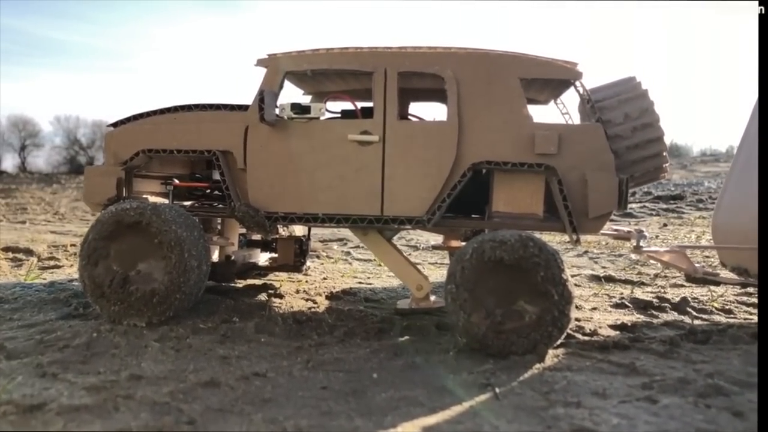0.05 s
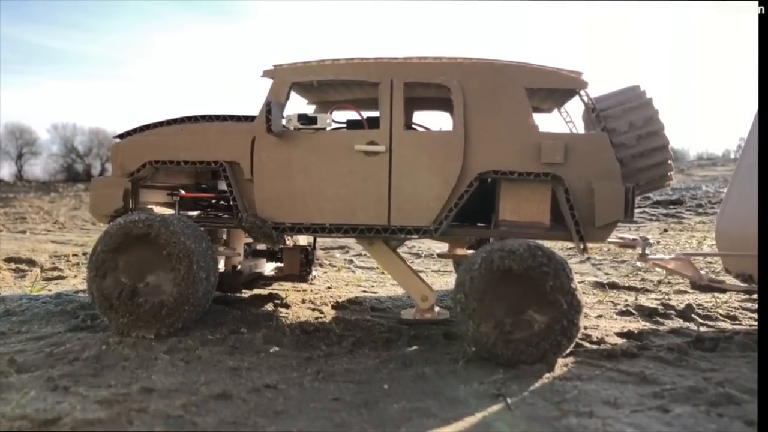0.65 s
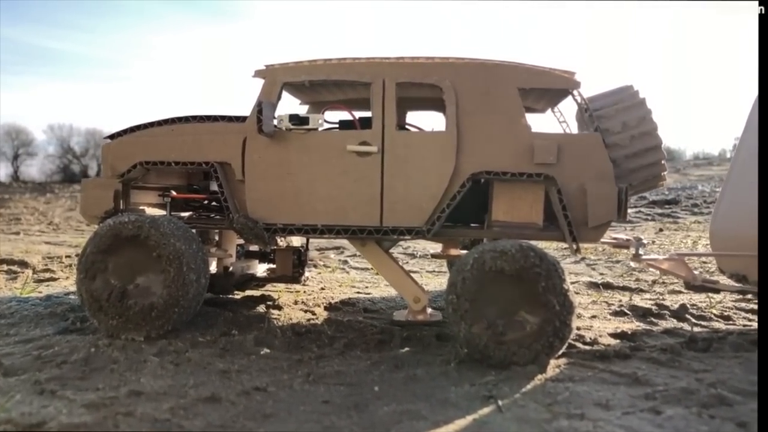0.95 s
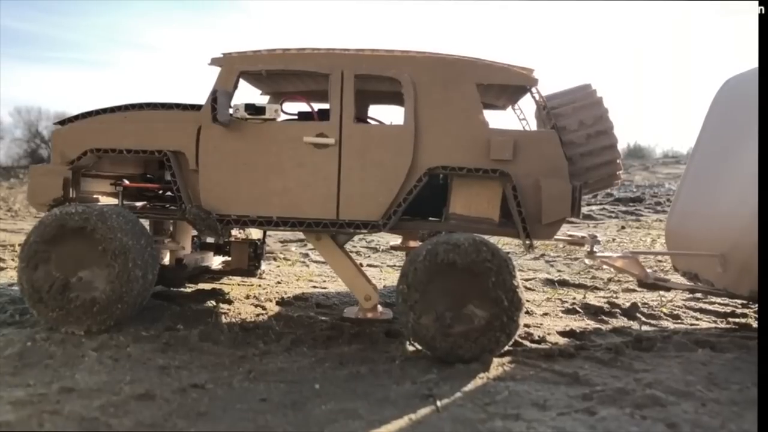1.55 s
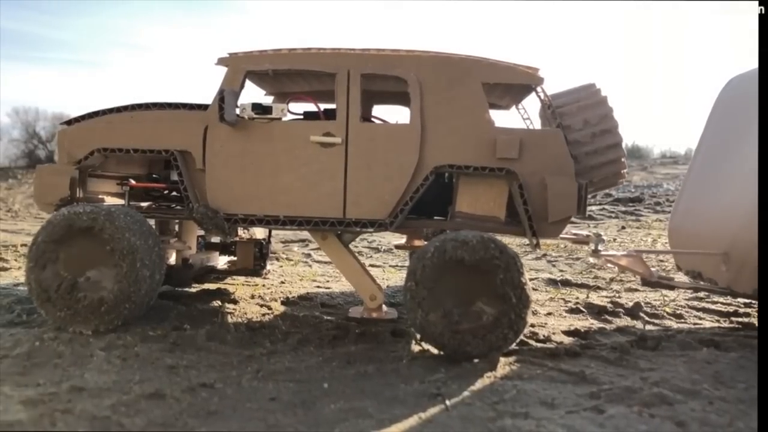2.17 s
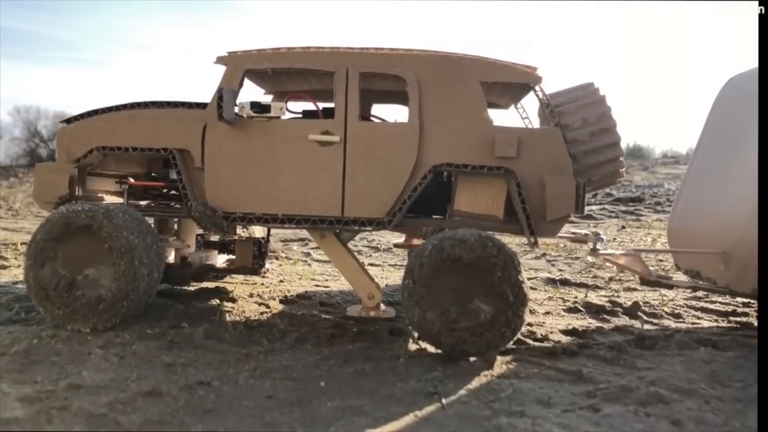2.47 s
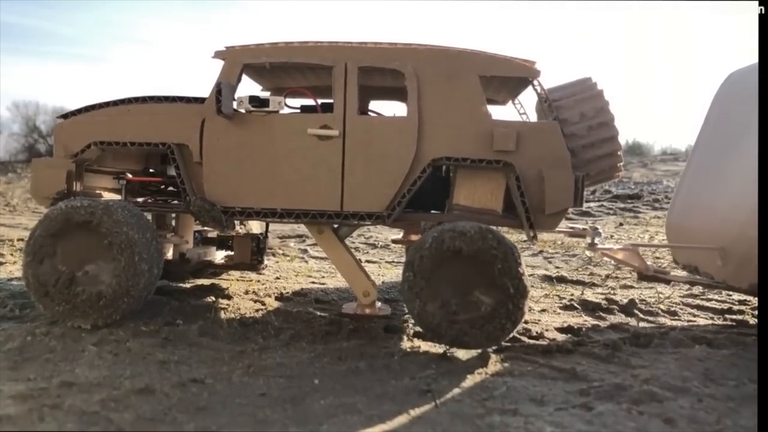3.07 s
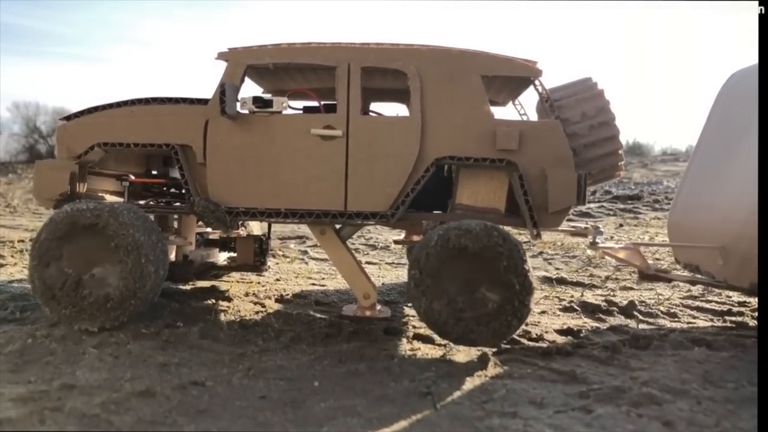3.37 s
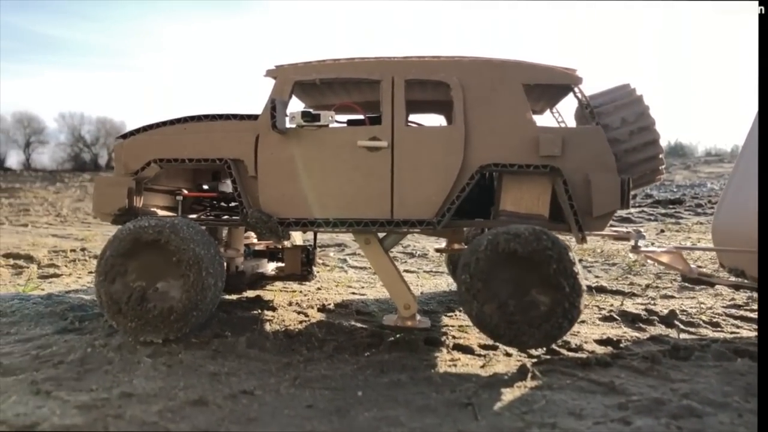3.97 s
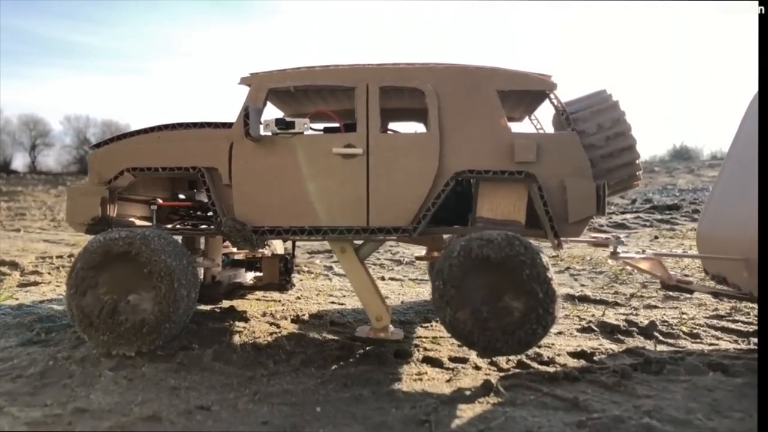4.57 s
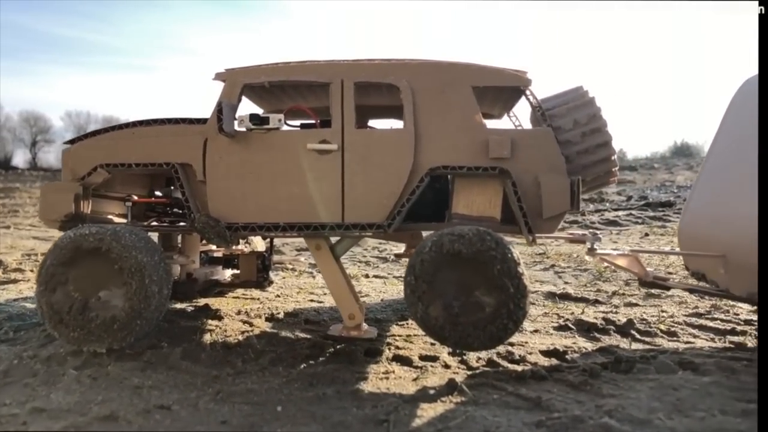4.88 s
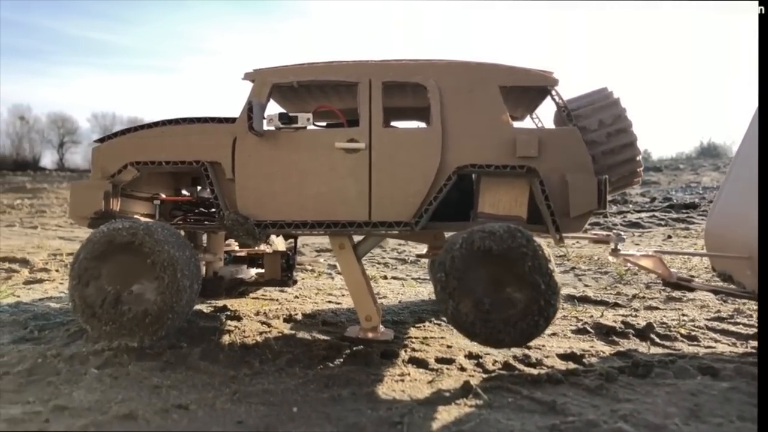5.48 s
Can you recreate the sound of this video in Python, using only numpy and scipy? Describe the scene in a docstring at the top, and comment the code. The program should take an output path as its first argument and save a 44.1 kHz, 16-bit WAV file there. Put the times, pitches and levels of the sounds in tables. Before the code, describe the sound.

Gusts rumble on the microphone while a model truck's little geared motor whines, bogs down under load and picks up again.

```python
"""A model truck jacks itself up on its legs on a dirt field, close to the microphone.
From the start, gusts rumble and thump on the microphone while the small electric motor whines freely
and its gears hiss in their housing. At 1 s the feet touch down; at 1.3 s a leg clicks as it takes
the weight, and the motor bogs down and hunts. From 3 s it picks up again, slowed briefly by each
snag of the legs."""
import sys
import numpy as np
from scipy.fft import rfft, irfft, next_fast_len
from scipy.io import wavfile
from scipy.ndimage import uniform_filter1d, map_coordinates

SR = 44100
rng = np.random.default_rng(int(sys.argv[2]) if len(sys.argv) > 2 else 0)


def dump(signal):
    """Clip the signal to [-1, 1] and save it as 16-bit WAV at the path in sys.argv[1]."""
    limited = np.clip(np.atleast_2d(signal).T, -1, 1)
    pcm = np.round(limited * 32767).astype(np.int16)
    wavfile.write(sys.argv[1], SR, pcm)


N = 248261

# progress of the lift: time_s, stage (0 free, 1 straining, 2 lifting)
LIFT_STAGE = [(0, 0.04), (1.0, 0), (1.05, 0.15), (1.31, .25), (1.33, 1), (2.95, 1), (3.25, 1.35),
              (3.8, 1.9), (5.63, 2.1)]


def amp(db):
    """Amplitude ratio of a level in decibels."""
    return 10 ** (np.asarray(db) / 20)


def unit(x):
    """Normalisation to rms 1."""
    return x / np.sqrt(np.mean(x ** 2) + 1e-20)


def along(points, hz):
    """Interpolation of (frequency_hz, value) points on a logarithmic frequency axis."""
    knots_hz, values = np.transpose(points)
    return np.interp(np.log(hz + 1), np.log(knots_hz + 1), values)


def curve(points):
    """Linear interpolation of (time_s, value) points at every sample."""
    return np.interp(np.arange(N) / SR, *np.transpose(points))


def wobble(rate_hz):
    """Smooth random modulation: a spline through rate_hz Gaussian values a second."""
    return map_coordinates(rng.standard_normal(N // 8), [np.arange(N) * rate_hz / SR], mode="wrap")


def filtered(x, response):
    """Linear filtering: the spectrum is multiplied by a frequency response."""
    size = next_fast_len(N + SR // 2)
    return irfft(rfft(x, size) * response(np.fft.rfftfreq(size, 1 / SR)), size)[:N]


def noise(spectrum):
    """Spectral shaping of white noise, at rms 1."""
    return unit(filtered(rng.standard_normal(N), lambda hz: amp(along(spectrum, hz))))


def ringing(modes):
    """Resonance: noise drives (centre_hz, width_hz, level_db) modes whose powers add; rms 1."""
    def response(f):
        peaks = (amp(db) / (1 + (2 * (f - hz) / width) ** 2) for hz, width, db in modes)
        return np.sqrt(sum(peak ** 2 for peak in peaks))
    return unit(filtered(rng.standard_normal(N), response))


def gust_envelope(layer, breeze_db, t60_s, attack_s=0.022):
    """Gusts rise, hold and decay exponentially to the breeze (layer 0 rumble, 1 flutter)."""
    # gusts of wind: start_s, length_s, rumble_db, flutter_db
    gusts = [(0, 0.056, -23, -34.5), (0.152, 0.45, -29, -35), (0.656, 0.086, -24.5, -30.5),
             (0.799, 0.18, -29.5, -35.5), (1.076, 0.012, -20, -25.5), (1.131, 0.17, -33, -32.5),
             (1.354, .22, -43, -57), (1.707, .015, -44, -54), (2.02, 0.04, -33, -30.5),
             (2.168, .1, -33.5, -36.5), (2.316, 0.17, -39.5, -48.5), (2.74, 0.057, -32.5, -31.5),
             (2.931, 0.038, -36.5, -45.5), (3.216, 0.028, -43, -60), (3.393, .04, -29.5, -33),
             (3.529, .11, -37, -51), (3.719, 0.065, -31.5, -40.5), (3.91, 0.36, -33.5, -48),
             (4.324, 0.015, -31, -39.5), (4.492, 0.069, -33, -41.5), (4.583, .41, -32.5, -41.5),
             (5.075, 0.5, -36.5, -43)]
    t = np.arange(N) / SR
    gain = np.full(N, amp(breeze_db))
    for start_s, length_s, *levels_db in gusts:
        rise = np.clip(1 + (t - start_s) / attack_s, 0, 1)
        decay_db = 60 * np.maximum(t - start_s - length_s, 0) / t60_s
        gain = np.maximum(gain, rise * amp(levels_db[layer] - decay_db))
    return gain


def wind(rumble_gain_db, flutter_gain_db, lumpy_db, swirl_db):
    """Turbulent pressure on the microphone: a deep rumble and a lumpy flutter above it."""
    # spectra of the turbulence: frequency_hz, relative_density_db
    rumble_spectrum = [(12, -36), (25, 4), (42, 3.5), (75, 0.5), (110, -4), (160, -15.5), (300, -38.5),
                       (600, -114)]
    flutter_spectrum = [(60, -22), (130, 4.5), (200, -3), (300, -7), (500, -19.5), (800, -34.5),
                        (1400, -45.5), (3000, -57)]
    rumble = noise(rumble_spectrum)
    # evened out, so that the gusts set its slow swell
    rumble /= np.sqrt(abs(uniform_filter1d(rumble ** 2, SR // 14)) + 0.00087)
    rumble *= gust_envelope(0, breeze_db=-54, t60_s=0.31)
    flutter = unit(noise(flutter_spectrum) * amp(lumpy_db * wobble(60)))
    flutter *= gust_envelope(1, breeze_db=-60.5, t60_s=0.15)
    swirl = unit(amp(swirl_db * wobble(25)))
    return swirl * (amp(rumble_gain_db) * rumble + amp(flutter_gain_db) * flutter)


def buffets(period_growth, t60_s, ragged_db):
    """A passing eddy is a damped pressure oscillation that slows; soft ones start lower and duller."""
    # eddies that hit the microphone: start_s, level_db, edge_db (higher is sharper)
    eddies = [(0.138, -14, -27.5), (0.208, -27, -32), (0.262, -13.5, -40), (0.376, -27, -12.5),
              (0.5, -23, -18), (0.556, -19.5, -20), (0.654, -23, -14), (0.696, -22, -13.5),
              (0.716, -16.5, -23.5), (0.804, -13, -17.5), (0.842, -26, -20.5), (0.883, -20, -28),
              (1.069, -21, -21.5), (1.161, -26, -20), (1.188, -23, -12.5), (1.234, -26, -13),
              (1.272, -22.5, -14), (2.03, -21.5, -24), (2.258, -17, -12.5), (2.443, -35, -16),
              (2.752, -21.5, -27), (2.803, -26.5, -12), (2.848, -24, -32), (3.4, -20.5, -24),
              (3.419, -28.5, -18), (3.534, -33.5, -19), (3.715, -25.5, -22), (3.751, -33, -18),
              (4.337, -26.5, -31.5), (4.439, -21, -32.5), (4.586, -18, -32), (4.788, -20.5, -31),
              (4.824, -23, -30), (4.956, -25, -23.5), (5.19, -21.5, -21.5), (5.532, -25.5, -17.5)]
    # colour of the sharpest eddy: frequency_hz, gain_db
    eddy_spectrum = [(45, -18.5), (95, -8), (200, -3.5), (420, -4), (900, -9), (1400, -19)]
    sharp_edge_db, sharp_hz, knee_hz = -12, 1397.5, 204
    t = np.arange(SR // 8) / SR
    out = np.zeros(N + SR)
    for start_s, level_db, edge_db in eddies:
        softness_db = sharp_edge_db - edge_db
        first_hz = sharp_hz * 2 ** (-softness_db / 12)
        hz = 1 / (1 / first_hz + period_growth * t)
        # no two swings are alike in length or size, so the thump is ragged
        chance = rng.standard_normal((2, 40))
        swings = np.cumsum(hz) / SR
        stretch, size = (map_coordinates(row, [3 * swings], mode="wrap") for row in chance)
        phase = 2 * np.pi * (np.cumsum(hz * np.exp(.25 * stretch)) / SR + chance[0, -1])
        dulling_db = 0.64 * softness_db * np.log2(np.maximum(hz / knee_hz, 1))
        db = level_db + along(eddy_spectrum, hz) + ragged_db * size - dulling_db
        envelope = amp(db - 60 * t / t60_s) * (1 - np.exp(-t * first_hz))
        out[round(start_s * SR):][:len(t)] += envelope * np.sin(phase)
    return out[:N]


def shaft_speed():
    """Load slows a motor: its rotation rate in Hz sags under the weight and dips at each snag."""
    # rotation of the motor shaft: time_s, speed_hz
    rotation = [(0, 205), (1.01, 193.3), (1.04, 188), (1.31, 185.5), (1.325, 159), (1.37, 159), (1.45, 128),
                (1.58, 154), (1.64, 146), (1.69, 130), (1.87, 124), (2.0, 135), (2.07, 123), (2.24, 121),
                (2.36, 135), (2.55, 144), (2.87, 123), (3.02, 146), (3.13, 144), (3.2, 153), (3.85, 153.5),
                (3.93, 159), (4.6, 159.5), (5.05, 165.5), (5.28, 173), (5.63, 174)]
    # snags of the legs: centre_s, length_s, lost_hz
    snags = [(4.055, .11, 8), (4.15, .2, 8), (4.4, .16, 10), (4.77, .2, 7.5), (5.11, .13, 11),
             (5.39, .18, 8)]
    t = np.arange(N) / SR
    dips = sum(lost_hz * np.cos(np.pi * np.clip((t - centre_s) / length_s, -.5, .5)) ** 2
               for centre_s, length_s, lost_hz in snags)
    return curve(rotation) - dips


def strain(easy_hz=154, bogged_hz=136):
    """Strain grows as speed falls: 0 while the motor turns easily, 1 when it is bogged down."""
    return np.clip((easy_hz - shaft_speed()) / (easy_hz - bogged_hz), 0, 1)


def loaded(free_db, touch_db, bearing_db, strain_db, bite_db):
    """Level follows load: it steps at touch-down, surges as the gears bite, then tracks the strain."""
    touch_s, load_s, settle_s, bite_decay_s = 1.03, 1.325, .025, 0.13
    steps = [(touch_s - settle_s, free_db), (touch_s, touch_db),
             (load_s - settle_s / 2, touch_db), (load_s, bearing_db)]
    age = np.arange(N) / SR - load_s
    bite = np.clip(1 + 2 * age / settle_s, 0, 1) * np.exp(-np.maximum(age, 0) / bite_decay_s)
    return curve(steps) + strain_db * strain() + bite_db * bite


def leg_click(start_s, peak_db, t60_s):
    """A broadband transient, decaying exponentially, as a leg takes the weight."""
    age = np.arange(N) / SR - start_s
    return amp(peak_db - 60 * abs(age) / t60_s) * (age > 0) * rng.uniform(-1, 1, N)


def gears(chatter_db, drift_db):
    """Friction of sliding teeth excites gear and housing modes; the hiss changes colour with the load."""
    # modes of the gears: centre_hz, width_hz, free_db, straining_db, lifting_db
    gear_modes = [(4800, 370, -14, -9, -12), (6210, 820, -12, -37, -11), (6860, 440, -15, -13.5, -10.5),
                  (7925, 740, -3, -6, 2.5), (8820, 1500, -7, -7, -9), (9830, 450, -4.5, 2.5, 3.5),
                  (10650, 640, -10, -3, -2.5), (11380, 900, -12.5, -4.5, -32), (12290, 570, -23, -5, 4),
                  (13100, 800, -10, -18, -38), (14200, 1050, -13, -6, -9), (14400, 1500, -16, -15, -7)]
    # modes of the housing: centre_hz, width_hz, level_db
    housing_modes = [(820, 7800, -19.5), (1020, 170, -17.5), (1580, 1300, -11), (1998, 209, 6),
                     (2464, 650, -5), (3317, 390, -10.5), (3753, 390, -10), (4166, 270, -10),
                     (4650, 430, -9.5), (5190, 410, -12.5)]
    stage = curve(LIFT_STAGE)
    hiss = np.zeros(N)
    for k in range(3):
        share = np.clip(1 - abs(stage - k), 0, 1)
        hiss += np.sqrt(share) * ringing([(hz, width, levels[k]) for hz, width, *levels in gear_modes])
    contact_force = unit(amp(chatter_db * wobble(150)))
    hiss *= contact_force * amp(loaded(-57, -56, -49.5, strain_db=-1, bite_db=1))
    housing = ringing(housing_modes) * amp(loaded(-56.5, -56, -54.5, strain_db=-1.5, bite_db=1))
    return amp(drift_db * wobble(85)) * (housing + hiss)


def motor_whine(segments, jitter_cycles, flicker_db):
    """Harmonics of the commutation rate, set by the segments of the commutator, blurred by jitter, over a hum
    of shaft orders."""
    # radiation response of the motor can: frequency_hz, gain_db
    can_response = [(4500, -22), (6000, -21), (6700, -14), (7250, -17), (7700, 0), (8900, -2), (9300, -5),
                    (9850, 0), (10400, -8), (11300, -7), (12300, -5), (13100, -13), (14500, -13)]
    # low harmonics of the shaft rotation: order, free_db, loaded_db
    shaft_orders = [(6, -64.5, -76), (7, -73, -79), (9, -66, -76), (10, -69, -72), (13, -69, -68),
                    (16, -69, -75), (26, -72, -85)]
    level_db = loaded(-63.5, -55, -53.5, strain_db=-6.5, bite_db=4)
    tilt_db = loaded(-7, -8, -1.5, strain_db=2, bite_db=0)
    effort = strain()
    unsteadiness = .0028 + .012 * effort  # share of the speed
    shudder, hunting = wobble(70), wobble(20)
    shaft_hz = shaft_speed() * (1 + unsteadiness * (shudder + hunting))
    turns = np.cumsum(shaft_hz) / SR
    commutation_cycles = segments * turns + jitter_cycles * wobble(500)
    out = np.zeros(N)
    for k in range(3, 8):
        db = level_db + along(can_response, k * segments * shaft_hz) + tilt_db * np.clip(k - 4, 0, 2)
        out += amp(db + flicker_db * wobble(120)) * np.sin(2 * np.pi * k * commutation_cycles)
    # the first touch of load already damps the hum, and strain lowers it further
    load = np.clip(5 * curve(LIFT_STAGE), 0, 1)
    for order, free_db, loaded_db in shaft_orders:
        db = free_db + load * (loaded_db - free_db) - 4 * effort
        out += amp(db + flicker_db * wobble(55)) * np.sin(2 * np.pi * order * turns)
    return np.sqrt(2) * out


def scene():
    """Superposition of the truck and the wind in one channel."""
    truck = motor_whine(segments=13, jitter_cycles=.022, flicker_db=3)
    truck += leg_click(start_s=1.321, peak_db=-35, t60_s=.009)
    truck += gears(chatter_db=2.0, drift_db=1.09)
    air = wind(rumble_gain_db=1.32, flutter_gain_db=-1, lumpy_db=5.0, swirl_db=1.93)
    air += buffets(period_growth=.33, t60_s=0.28, ragged_db=1.5)
    return (truck + air)[None]


def record(dry):
    """Band limiting: an ideal low-pass filter passes nothing above its cutoff."""
    cutoff_hz = 15740
    return np.array([filtered(x, lambda hz: hz < cutoff_hz) for x in dry])


dry = scene()
out = record(dry)
dump(out)
```